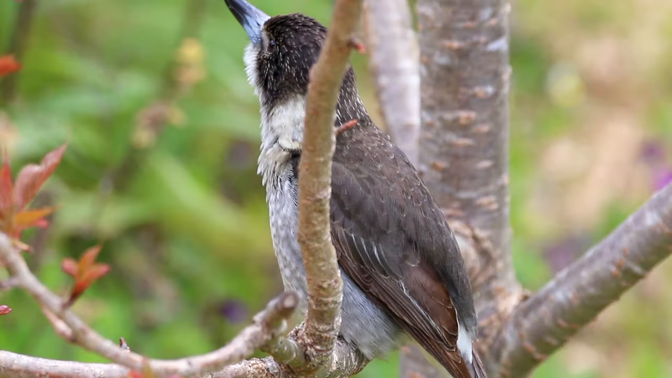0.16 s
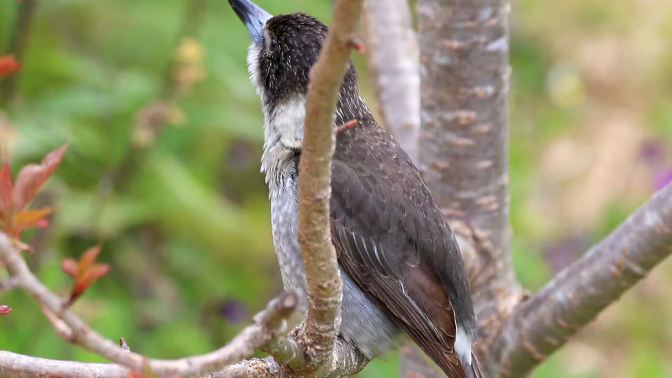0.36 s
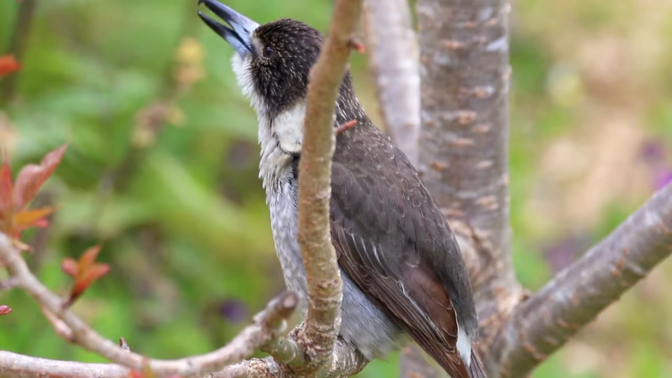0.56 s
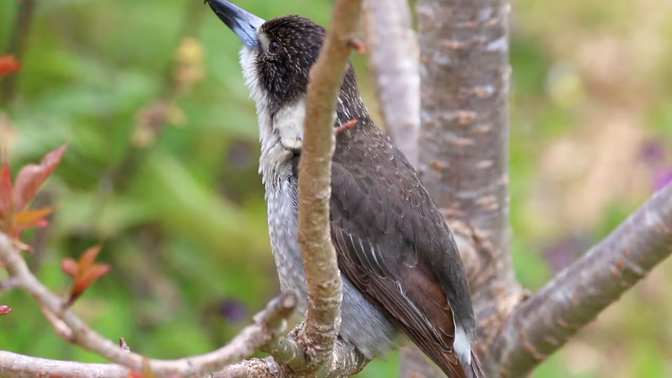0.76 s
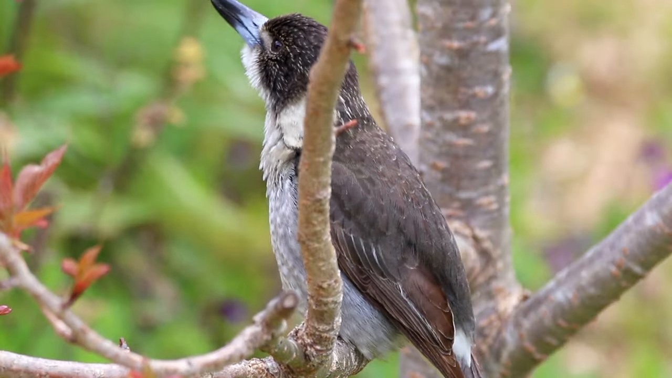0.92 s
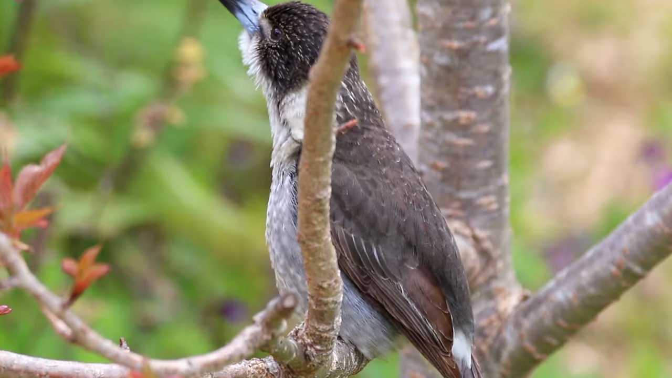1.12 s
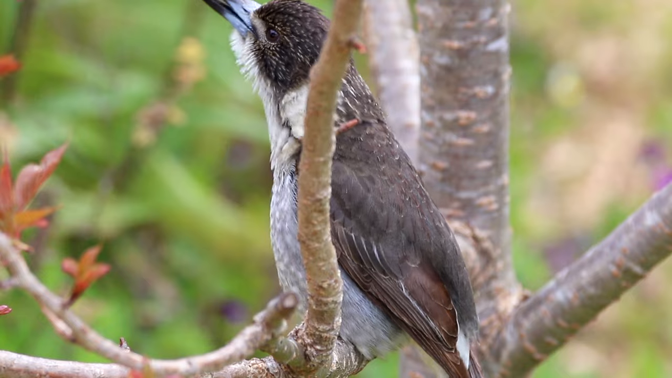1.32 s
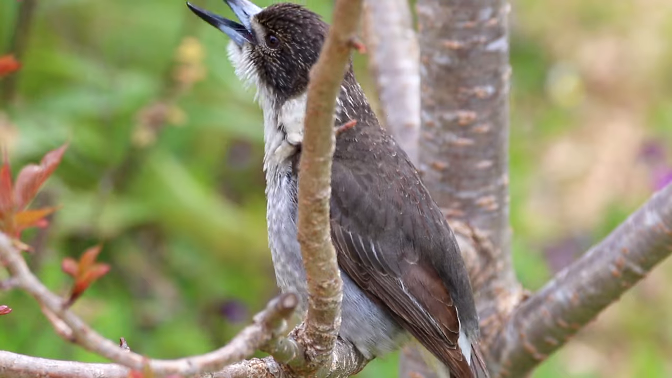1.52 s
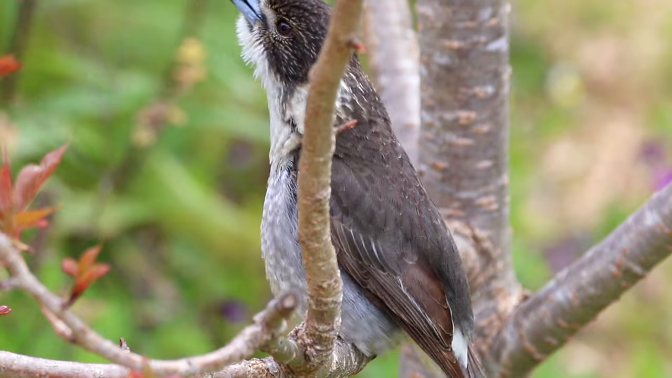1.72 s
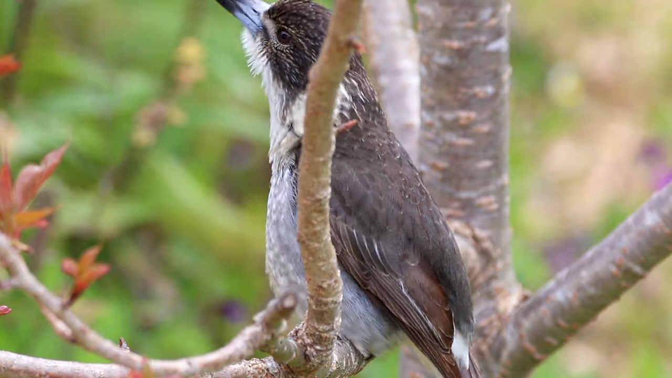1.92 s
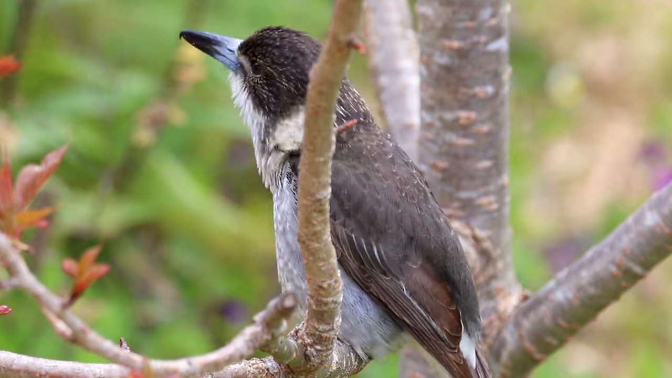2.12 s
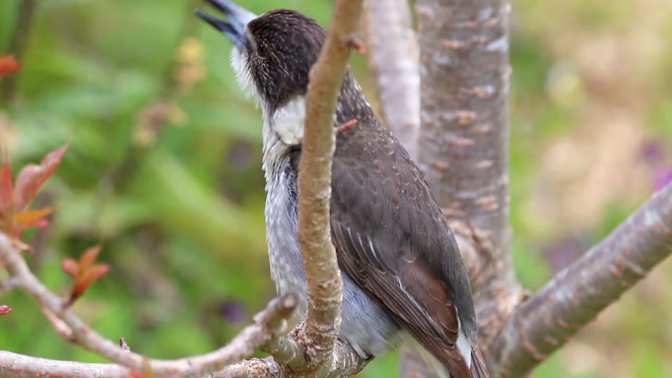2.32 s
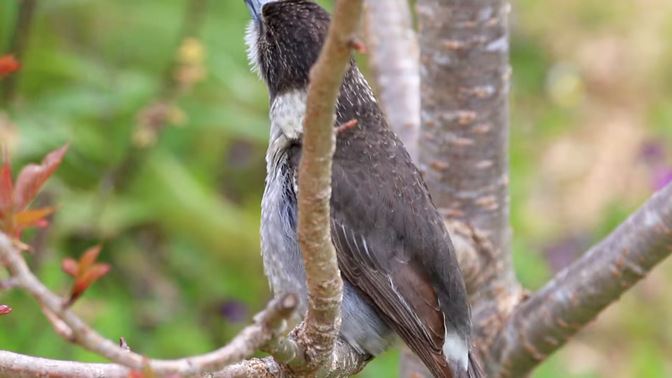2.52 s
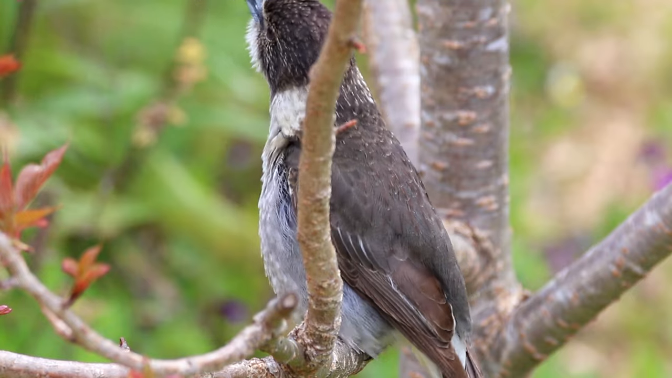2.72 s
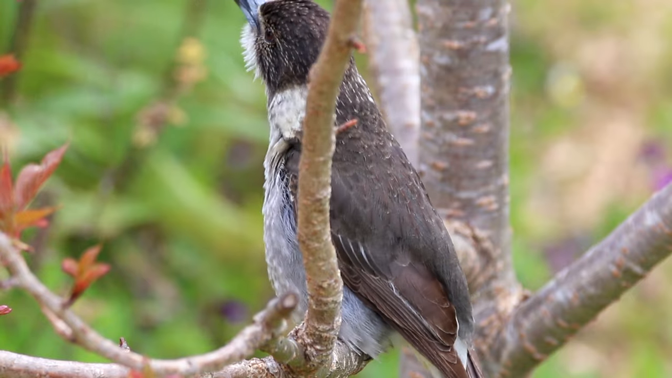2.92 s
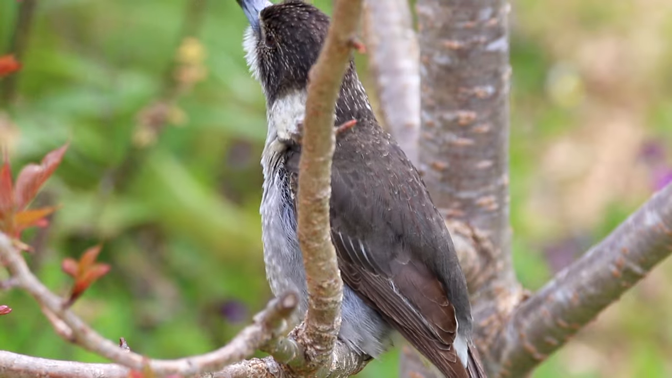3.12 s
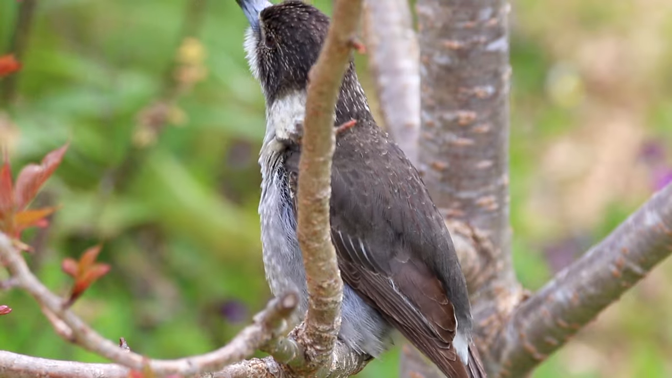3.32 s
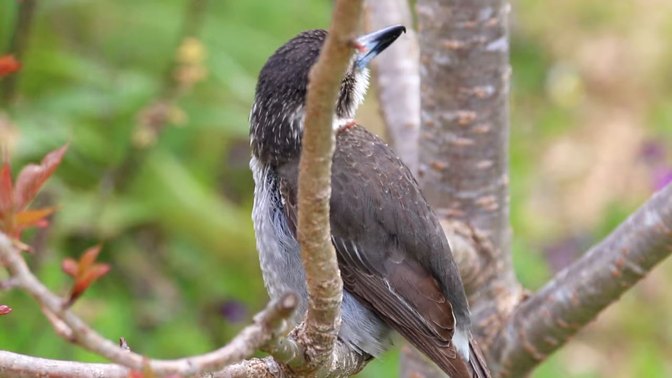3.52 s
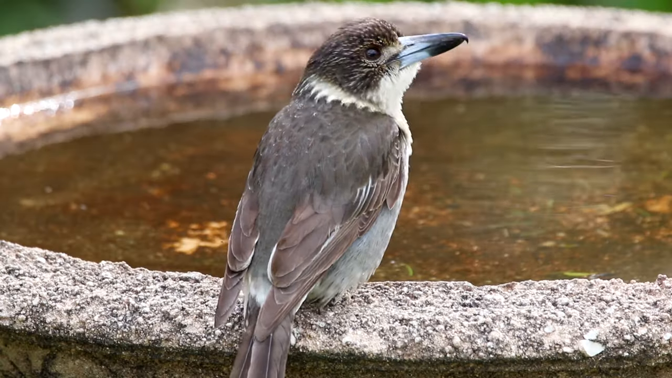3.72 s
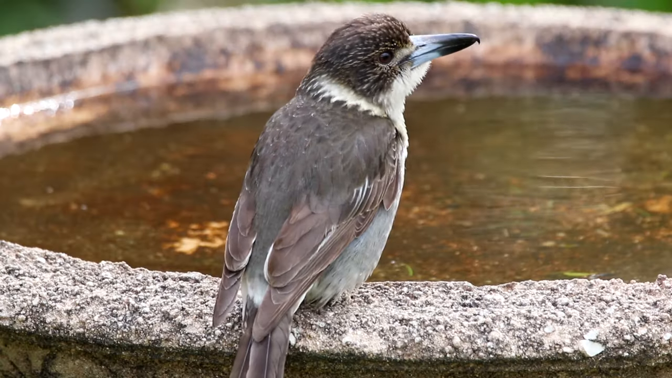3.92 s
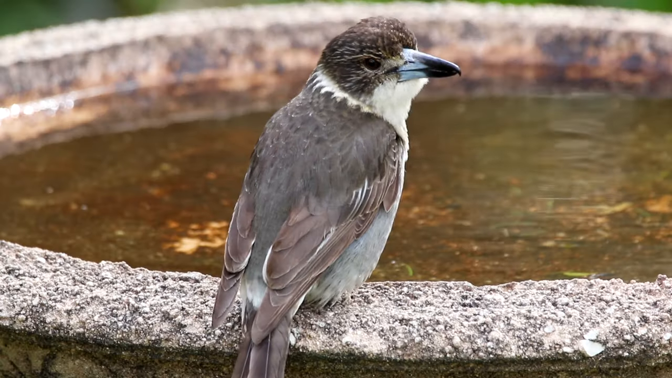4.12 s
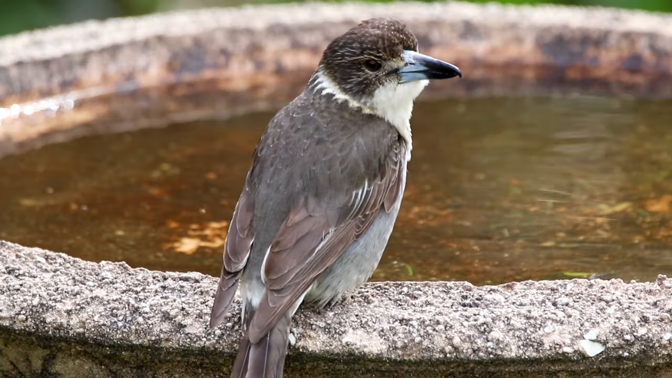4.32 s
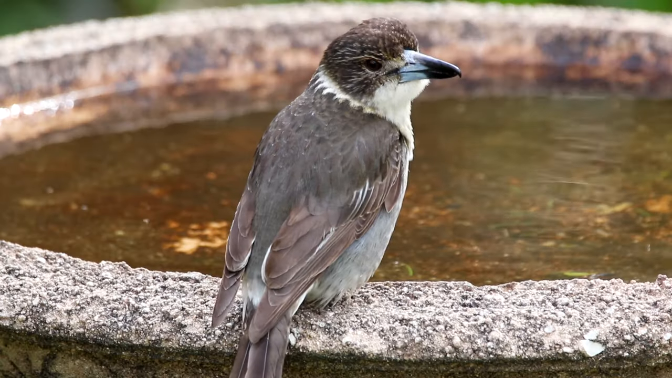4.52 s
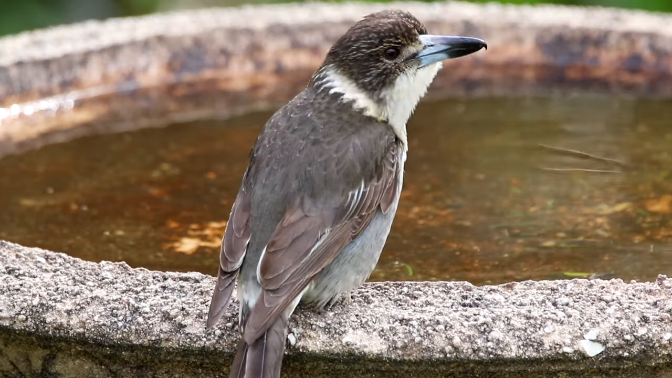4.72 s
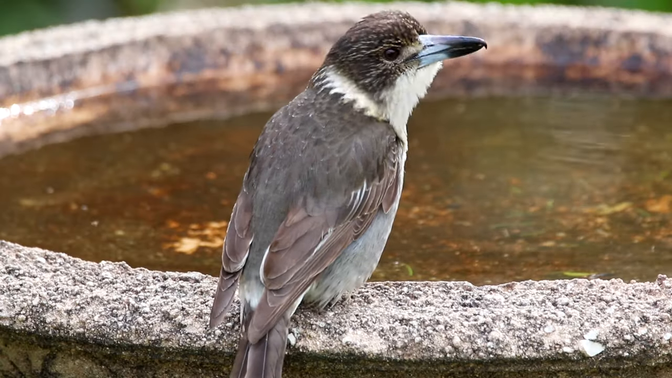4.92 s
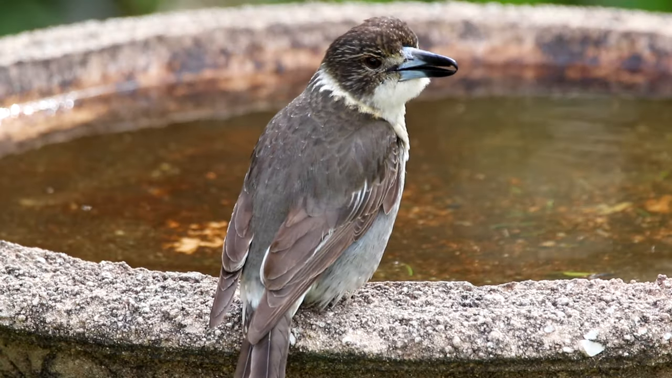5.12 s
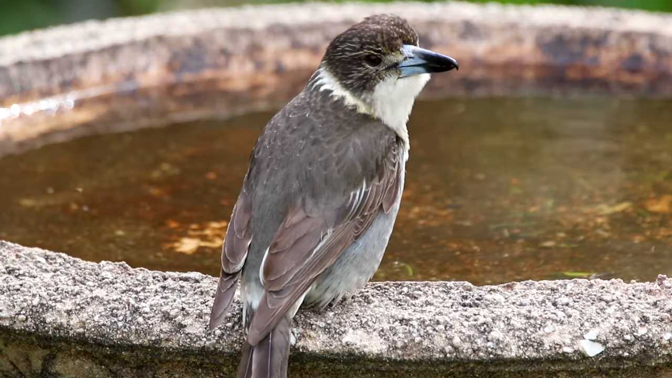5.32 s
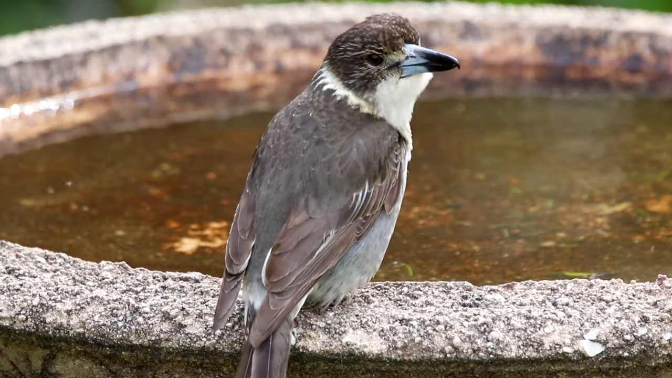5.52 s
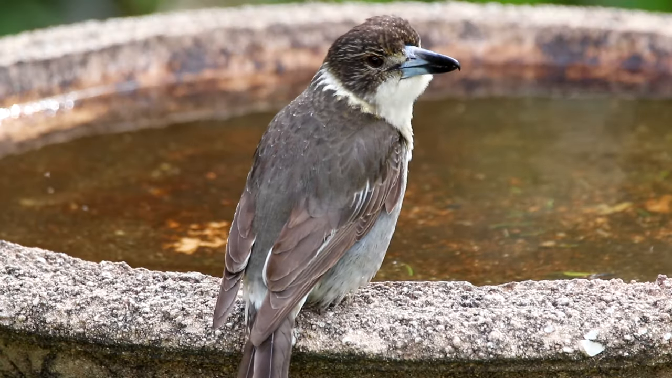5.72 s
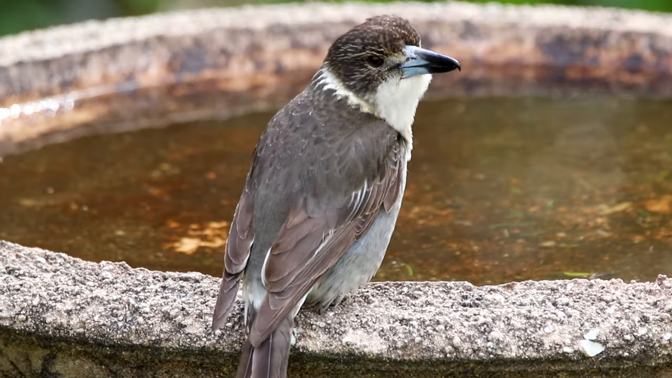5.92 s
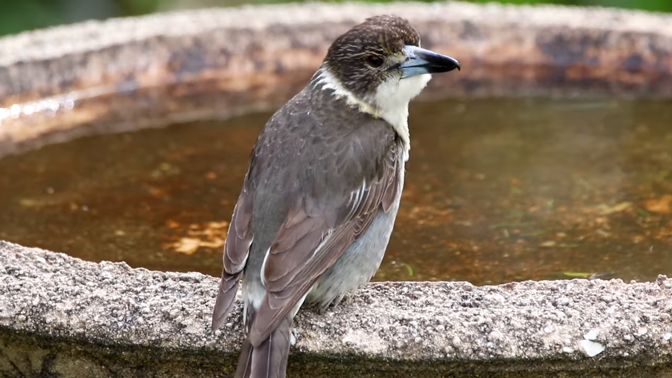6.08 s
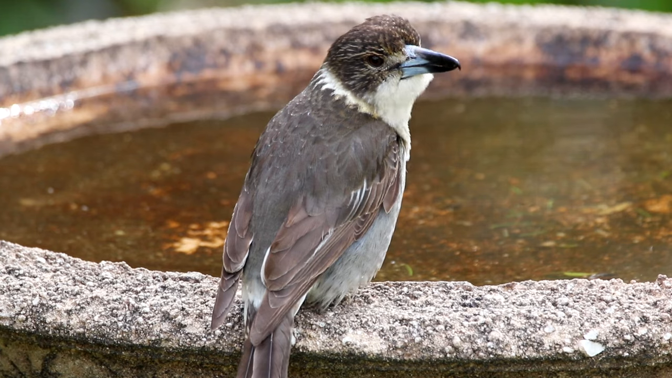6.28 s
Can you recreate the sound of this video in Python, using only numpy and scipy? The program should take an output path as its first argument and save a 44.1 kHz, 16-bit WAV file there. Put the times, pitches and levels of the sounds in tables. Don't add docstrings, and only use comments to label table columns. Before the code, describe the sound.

A quiet garden with low distant traffic, faint leaf hiss and a passing car fading at the start. From 0 to 0.85 s a butcherbird gives short soft glides, rising then falling, pure and shaky. At 1.0 s it begins a loud phrase: a wavering warble, a dip and climb around 1.3 s, then falling and fluty pipes from 1.6 to 1.97 s. A quiet low hum follows at 2.1 s. The second, louder phrase runs 2.4 to 3.0 s, with two falling pipes, tiny upward flicks, a bright pipe ending high and a closing pip, echoing off walls and trees. A low engine drone swells around 2 to 2.9 s and returns faintly near the end. After 3.6 s the background is slightly louder; soft scattered notes continue from 3.8 s, with rough scolds at 5.25 and 6.3 s and a clearer held note at 5.5 s. Tiny far birds chirp and rasp throughout.

```python
import sys
import numpy as np
from scipy import signal
from scipy.fft import rfft, irfft, next_fast_len
from scipy.io import wavfile
from scipy.ndimage import uniform_filter1d, map_coordinates

SR = 44100
rng = np.random.default_rng(int(sys.argv[2]) if len(sys.argv) > 2 else 0)


def gain_from_db(level_db):
    decades = np.asarray(level_db, float) / 20
    return 10 ** decades


def master(y):
    cut = np.clip(np.atleast_2d(y).T, -1, 1)
    pcm = np.round(cut * 32767)
    wavfile.write(sys.argv[1], SR, pcm.astype(np.int16))


N = 280035
EARLY_S = 0.1


def unit(x):
    return x / np.sqrt(np.mean(x ** 2) + 1e-20)


def along(points, hz):
    f, v = np.transpose(points)
    return np.interp(np.log(hz + 1), np.log(f + 1), v)


def curves(rows, t):
    s, *columns = np.transpose(rows)
    return [np.interp(t, s, column) for column in columns]


def wobble(rate, size):
    knots = rng.standard_normal(size=512)
    return map_coordinates(knots, [np.arange(size) * rate / SR], mode="wrap")


def noise(gain):
    m = next_fast_len(N)
    spectrum = rfft(rng.standard_normal(m)) * gain(np.fft.rfftfreq(m, 1 / SR))
    return unit(irfft(spectrum, m)[:N])


def shaped(shape, calls):
    notes = []
    for s, length, from_hz, to_hz, db in calls:
        notes.append([(s + u * length, from_hz + glide * (to_hz - from_hz), db + under_db)
                      for u, glide, under_db in shape])
    return notes


# frequency in Hz, level in dB per Hz.
TRAFFIC = [(15, -60), (25, -0.5), (236, -1), (300, -6.5), (345, -4), (381, -6), (485, -5), (1400, -11),
           (1610, -22.5), (1750, -14), (3000, -37.5), (3900, -45), (6600, -120)]
# frequency in Hz, level in dB per Hz.
LEAVES = [(1180, -25), (2000, -5.5), (2370, -4), (2840, -5), (3620, -8.5), (3970, -11), (6100, -12),
          (8390, -11.5), (15600, -17)]
# time in seconds, level in dB.
DRONE = [(0, -74.5), (1.5, -61.5), (2.03, -47.5), (2.87, -50), (3.1, -56), (4.9, -61.5), (5.9, -59.5),
         (6.35, -52.5)]


def background():
    t = np.arange(N) / SR
    move_s, move_takes_s = 3.63, 0.35

    def placed(tree_db, bath_db):
        return np.interp(t, [move_s, move_s + move_takes_s], [tree_db, bath_db])

    def low(f):
        return 1 / (1 + (f / 90) ** 4)

    rumble_db = placed(-84, -76.5) + 4.5 + 1.1 * wobble(3.1, N)
    rumble = gain_from_db(rumble_db) * noise(lambda f: gain_from_db(along(TRAFFIC, f)) * low(f))
    departing_db = 3.5 * np.exp(-t / 1.0)
    traffic_db = placed(-62, -59) + departing_db + 2.0 + 0.12 * wobble(2.5, N)
    traffic = gain_from_db(traffic_db) * noise(lambda f: gain_from_db(along(TRAFFIC, f)) * (1 - low(f)))
    leaves = gain_from_db(placed(-70, -67.5)) * noise(lambda f: gain_from_db(along(LEAVES, f)))
    drone_hz = 205.5 * (1 + 0.012 * wobble(14, N))
    turns = np.cumsum(drone_hz) / SR
    drone_db = curves(DRONE, t)[0] - 12.5 + 2.2 * wobble(9, N)
    drone = gain_from_db(drone_db) * np.sin(2 * np.pi * turns)
    return rumble + traffic + leaves + drone


# start in seconds, length in seconds, centre in Hz, width in Hz, level in dB.
CHATTER = [(0, 0.18, 3520, 2500, -72), (2.18, 0.32, 3080, 2590, -68), (3.258, 0.32, 4570, 3540, -69.5),
           (3.946, 0.094, 3380, 2500, -66.5), (4.197, 0.49, 3320, 2500, -73.5),
           (4.36, .06, 4400, 1200, -72), (4.59, 0.22, 3040, 2000, -73.5), (5.025, .03, 3300, 2500, -70),
           (6.003, 0.28, 2650, 1470, -74), (6.264, 0.15, 4430, 4000, -70)]


def chatter():
    t, out = np.arange(N) / SR, np.zeros(N)
    for s, length, centre_hz, width_hz, db in CHATTER:
        progress = np.clip((t - s) / length, 0, 1)
        swell = np.sqrt(np.sin(np.pi * progress).clip(0))
        band = noise(lambda f: np.exp(-2 * ((f - centre_hz) / width_hz) ** 2))
        out += gain_from_db(db + 0.53 * wobble(40, N)) * swell * band
    return out


# frequency in Hz, gain in dB.
THROAT = [(1500, 20.5), (3000, -2.5), (4500, -9), (5200, -6.5), (6500, -1.5), (8000, -12.5), (9500, -14),
          (11000, -17), (13000, -12.5), (16000, -31)]


def whistle(out, rows, voice, waver, count, steady=0, sheen_db=0, shake_db=2.1, shaping=None, opening=1):
    first = round((rows[0][0] + EARLY_S) * SR)
    size = round((rows[-1][0] - rows[0][0]) * SR)
    t = rows[0][0] + np.arange(size) / SR
    hz, level_db = curves(rows, t)
    overtone_db, even_db, beak_hz, lift_db, tilt_db = voice

    effort_db = uniform_filter1d(level_db, size=round(.02 * SR), mode="nearest") if steady else level_db
    bright_db = overtone_db + steady * (level_db.max() - effort_db) + effort_db - level_db
    bright_db = bright_db + 42 * np.log2(hz / 1450).clip(None, 0)
    bands = []
    if shaping:
        bands = [shaping[:2], shaping[2:4], (15600, shaping[5])]
        bright_db = bright_db + shaping[4] * np.linspace(-.5, .5, size)

    hz = uniform_filter1d(hz, size=150, mode="nearest") * (1 + waver * wobble(151, size))
    phase = 2 * np.pi * np.cumsum(hz) / SR
    tone = gain_from_db(shake_db * wobble(102.5, size)) * np.sin(phase)
    opening_db = -2.5 * opening * np.exp((t[0] - t) / .014)
    for k in range(2, count + 1):
        over_hz = k * hz
        beak_db = lift_db * np.cos(2 * np.pi * over_hz / beak_hz) + tilt_db * np.log2(over_hz / 5000)
        gain_db = bright_db + along(THROAT, over_hz) + beak_db + even_db * (1 - k % 2)
        gain_db += k * opening_db + sheen_db * np.exp(-((over_hz - 14000) / 2500) ** 2)
        for band_hz, db in bands:
            gain_db += db * np.exp(-((over_hz - band_hz) / 570) ** 2)
        breath = 1 + gain_from_db(-23) * np.sqrt(k) * wobble(1500, size)
        strength = gain_from_db(gain_db + 4.5 * wobble(60, size)) * breath
        tone += strength * (over_hz < SR / 2) * np.sin(k * phase)
    edge = np.clip(np.minimum(t - t[0], t[-1] - t) / .003, 0, 1)
    laid = out.copy()
    laid[first:first + size] += np.sqrt(2) * gain_from_db(level_db) * edge * tone
    return laid


# part of the length from 0 to 1, part of the glide from 0 to 1, level against the peak in dB.
SWELL = [(0, 0.015, -7), (.3, .3, -2.5), (.7, .7, -2.5), (1, 0.94, -1.5)]
RISE = [(0, 0.012, -15), (.15, 0, -12), (.3, .09, -8.5), (.47, .32, -2), (.62, .76, 0.5), (.8, 0.98, 0.5),
        (1, 0.98, -15)]
FALL = [(0, 0, -16), (.12, 0.031, -4), (.43, 0.58, -3.5), (.65, .87, -4), (1, 1, -3.5)]
HOLD = [(0, 0.019, -9), (.18, .9, -3), (.26, 0.99, -4), (.52, .9, 4), (.64, 0.876, -9), (.85, 0.9, -9),
        (1, 0.64, -4.5)]
# start in seconds, length in seconds, first pitch in Hz, last pitch in Hz, peak in dB.
MUTTERS = [(-.06, 0.062, 1797, 1740, -48), (3.805, 0.078, 1355, 1530, -65),
           (3.849, 0.045, 1697, 1350, -58.5), (3.895, 0.054, 1380, 1656, -62),
           (4.11, 0.067, 1840, 1990, -52), (4.199, 0.045, 1477, 1500, -46),
           (4.409, 0.043, 1572, 1277, -52.5), (4.445, 0.047, 1350, 1884, -54.5),
           (4.84, 0.042, 1176, 1212, -49.5), (5.755, 0.038, 896, 1163, -47.5),
           (5.316, 0.026, 1325, 2010, -46.5), (6.241, .11, 1160, 1906, -53.5)]
RISES = [
    (0.162, 0.062, 813, 2150, -42.5),
    (0.593, 0.07, 854, 2276, -39.5),
    (4.853, 0.051, 1355, 2384, -49),
    (5.752, 0.078, 874, 2130, -54),
]
FALLS = [(0.333, 0.047, 1800, 876, -46), (.768, 0.05, 1896, 874, -42.5), (4.162, 0.042, 2393, 1530, -51),
         (5.005, 0.082, 1386, 1033, -46.5), (5.431, 0.06, 1524, 1010, -43.5),
         (5.938, 0.046, 1946, 825, -46.5)]
SCOLDS = [
    (5.237, 0.065, 2210, 1970, -52.5),
    (5.281, .018, 2010, 2640, -43),
    (6.272, 0.0356, 2334, 2170, -45.5),
    (6.302, 0.0246, 2140, 2590, -44),
]
HOLDS = [
    (5.507, 0.077, 1247, 1485, -35),
]
# overtones in dB, even overtones in dB, beak resonance spacing in Hz,
# beak lift in dB, tilt in dB per octave.
HOLD_VOICE = (-37, -1, 8600, 0, -3)


def soft_notes():
    soft = np.zeros(N + SR)
    for shape, calls, overtone_db in [(RISE, RISES, -30), (FALL, FALLS, -37), (SWELL, MUTTERS, -31)]:
        for rows in shaped(shape, calls):
            voice = (overtone_db, 1.5, 5000, 2.5, -3)
            soft = whistle(soft, rows, voice, waver=0.016, count=3, shake_db=3.0)
    for rows in shaped(HOLD, HOLDS):
        soft = whistle(soft, rows, HOLD_VOICE, waver=0.004, count=6, shake_db=.5,
                       shaping=(8500, 16, 6200, -14, -16, 0), opening=0)
    for rows in shaped(SWELL, SCOLDS):
        soft = whistle(soft, rows, (-22, 8, 7000, 3, 1.5), waver=0.0386, count=4, shake_db=4.0)
    return soft


# part of the length from 0 to 1, part of the glide from 0 to 1, level against the peak in dB.
ARCH = [(0, 0, -9), (.28, .85, -2), (.5, 1, 4), (.75, .7, -12.5), (1, .6, -19)]
# start in seconds, length in seconds,
# first pitch in Hz, last pitch in Hz, peak in dB.
FAR_BIRDS = [(0.018, 0.082, 4580, 4420, -70), (0.052, 0.018, 3370, 2580, -63),
             (1.958, 0.15, 3090, 3170, -71), (2.132, 0.071, 7320, 6970, -76),
             (3.278, 0.038, 3340, 3850, -63.5), (3.299, 0.026, 3705, 3344, -65.5),
             (3.543, 0.036, 2810, 3000, -72), (3.595, 0.035, 3110, 3205, -68),
             (3.796, .025, 2750, 2760, -76), (4.325, 0.092, 2130, 2890, -64.5),
             (5.29, 0.014, 4700, 5200, -75), (4.677, 0.043, 2670, 2300, -67),
             (6.039, 0.076, 2820, 3110, -72), (6.208, 0.041, 2480, 2474, -60),
             (6.273, 0.045, 2925, 2610, -54.5), (6.307, 0.021, 2730, 2900, -50.5),
             (5.287, 0.0254, 2930, 2720, -58)]
LONG_CALLS = [
    (.69, .3, 2900, 3190, -67),
    (.63, .12, 5950, 6100, -77),
    (1.13, .13, 5900, 5850, -79),
]
RASPS = [(0.453, 0.078, 6430, 5650, -75), (4.885, 0.028, 4700, 4800, -76), (2.182, 0.081, 2727, 3544, -69),
         (3.322, 0.21, 3600, 3550, -71), (4.211, 0.14, 2905, 3670, -68.5), (4.3, 0.12, 4200, 4550, -78),
         (4.32, 0.11, 2230, 2845, -70), (5.028, 0.018, 2370, 2220, -65), (6.27, 0.039, 7160, 6630, -80),
         (6.291, 0.037, 7070, 7400, -64)]
CROAK = [
    (3.93, 0.019, 1294, 1436, -70),
    (3.948, 0.026, 1417, 1274, -68),
    (4.0, .02, 1140, 1210, -86),
]
# overtones in dB, even overtones in dB, beak resonance spacing in Hz,
# beak lift in dB, tilt in dB per octave.
CROAK_VOICE = (8.5, 0, 5000, 1, -8.5)


def far_birds():
    calls = np.zeros(N + SR)
    for rows in shaped(SWELL, FAR_BIRDS) + shaped(ARCH, LONG_CALLS):
        calls = whistle(calls, rows, (-32, 6, 6000, 7, -2), waver=0.0081, count=2)
    for rows in shaped(SWELL, CROAK):
        calls = whistle(calls, rows, CROAK_VOICE, waver=0.012, count=6)
    for rows in shaped(SWELL, RASPS):
        calls = whistle(calls, rows, (-8, 0, 6000, 0, 0), waver=.14, count=2)
    return calls


# time in seconds, pitch in Hz, level in dB.
WARBLES = [
    [(1.022, 1915, -69), (1.032, 2340, -46), (1.05, 2020, -40), (1.066, 1965, -38), (1.076, 2428, -45),
     (1.087, 2010, -44), (1.096, 1454, -46), (1.112, 1680, -34), (1.126, 1780, -61)],
    [(1.264, 1074, -44.5), (1.276, 1646, -39.5), (1.29, 1312, -44), (1.299, 1120, -30), (1.306, 953, -46),
     (1.32, 830, -44)],
    [(1.318, 852, -40), (1.33, 1165, -37.5), (1.342, 1380, -33), (1.358, 1476, -33.5), (1.378, 1528, -31),
     (1.39, 1521, -36.5), (1.408, 1481, -32), (1.424, 1471, -33.5), (1.439, 1470, -78)],
]
DROPS_SUNG = [
    [(1.588, 1942, -45), (1.6, 1929, -33), (1.608, 1845, -32), (1.618, 1783, -27.5), (1.632, 1765, -25.5),
     (1.642, 1696, -26.5), (1.65, 1700, -41)],
    [(2.407, 1887, -43), (2.42, 1888, -36.5), (2.436, 1840, -30), (2.45, 1746, -23.5), (2.458, 1708, -21.5),
     (2.466, 1590, -23.5), (2.475, 1581, -29.5), (2.484, 1550, -40)],
    [(2.651, 1867, -41), (2.661, 1808, -35), (2.678, 1759, -27.5), (2.692, 1719, -20.5), (2.7, 1667, -23),
     (2.706, 1635, -30), (2.713, 1592, -24.5), (2.723, 1565, -35.5)],
]
PIPES = [
    [(1.7, 1320, -37), (1.716, 1308, -29.5), (1.728, 1339, -26.5), (1.742, 1340, -23.5), (1.755, 1302, -30),
     (1.767, 1277, -25), (1.778, 1265, -34.5), (1.786, 1285, -25), (1.804, 1250, -45)],
    [(1.862, 1236, -39), (1.874, 1233, -32.5), (1.883, 1238, -33), (1.897, 1306, -23.5), (1.907, 1316, -29),
     (1.928, 1266, -21), (1.937, 1210, -31), (1.947, 1139, -22.5), (1.967, 840, -37.5)],
    [(2.125, 790, -52), (2.145, 797, -40), (2.222, 789, -40), (2.24, 792, -49), (2.3, 790, -51),
     (2.4, 790, -62)],
    [(2.82, 1394, -40.5), (2.839, 1548, -30), (2.845, 1690, -20.5), (2.852, 1581, -21.5),
     (2.869, 1580, -29), (2.88, 1562, -22), (2.9, 1591, -24.5), (2.916, 1586, -22), (2.925, 1680, -17)],
]
# part of the length from 0 to 1, part of the glide from 0 to 1, level against the peak in dB.
FLICK = [(0, 0, 10), (.45, 0.94, 2.5), (1, 1, -5.5)]
PIP = [(0, 0.11, -13), (.33, 0.68, -2), (.66, .85, 1.5), (1, 0.96, -19)]
GRUNT = [(0, 0, -23), (.5, 0.56, -18.5), (1, 1, -7.5)]
# start in seconds, length in seconds, first pitch in Hz, last pitch in Hz, peak in dB.
FLICKS = [
    (1.64, 0.02, 1750, 2370, -38.5),
    (2.471, 0.018, 1568, 2245, -42),
    (2.576, 0.0086, 1870, 2110, -39),
    (2.921, 0.015, 1634, 2213, -39.5),
]
PIPS = [
    (2.557, 0.025, 1903, 1984, -40),
    (2.989, 0.0292, 1250, 1550, -29.5),
]
GRUNTS = [
    (2.799, 0.0244, 686, 940, -39.5),
    (2.973, 0.0154, 724, 900, -39),
]
# overtones at the peak in dB, even overtones in dB, beak resonance spacing in Hz,
# beak lift in dB, tilt in dB per octave.
VOICES = [(-23, 0, 4900, 2.5, 0.5), (-27.5, 9, 7600, 6, 2.5), (-26, 1.5, 3400, 3, 4),
          (-13.5, -4, 6450, 7, -3), (-28.5, 0, 9300, 5.5, 4), (-22, -8, 6300, -4, 5.5),
          (-12, -4, 4700, -4, 3.5), (-22, -5.5, 5280, 8, -4), (-5.5, -2.5, 4800, 5, 4.5),
          (-17, -5.5, 4710, 7, 0.5), (14, 6, 2400, 10, -5), (-21, -4.5, 4740, 7, 1), (12, 4.5, 2770, 4, -3),
          (-22, 1, 7700, -4.5, 5.5)]
FLICK_VOICE = (-10.5, 4.5, 5494, 1.5, 3)
# first band in Hz, its gain in dB, second band in Hz, its gain in dB, brightening over the note in dB.
THROAT_SHAPES = [(8350, -10, 4700, -2.5, -4), (12500, -4, 10200, 12, 0), (11900, -15, 10500, 11.5, -2),
                 (12300, -14, 10840, 8.5, 9.5), (7850, -7, 6900, 6, -16.5), (11500, -9, 7100, -2, -6),
                 (4060, 2, 2400, 4, -7), (15300, -15, 12700, 3, -4.5), (8100, -15, 12000, -15, -1),
                 (14600, -14, 13400, 2, 11), (10500, -7, 7400, 8, -13), (14300, -16, 5320, 3.5, 0),
                 (6000, -10, 3200, -1, 0), (13440, 5, 8600, 4, -15), (6300, 11, 9000, -8, 6),
                 (6700, 1, 9940, 17, -16), (8300, -13, 10200, 5, 2), (12930, -9, 8000, 8, -6)]
SHEEN_DB = [0, 2, -13, 0, 0, -2, -2, 15, 0, -3, 4, -6, -7, -5, -4]
TOP_DB = [1, 0, -4, 10, 3, -3, 0, 0, 2, -2, 0, 14, 0, 0, 1]


def piping():
    loud = np.zeros(N + SR)
    notes = sorted(WARBLES + PIPES + DROPS_SUNG + shaped(PIP, PIPS) + shaped(GRUNT, GRUNTS))
    flicks = shaped(FLICK, FLICKS)

    def repeat_last(table):
        return table + table[-1:] * len(flicks)

    settings = zip(notes + flicks, repeat_last(VOICES + [FLICK_VOICE]), repeat_last(SHEEN_DB),
                   repeat_last(TOP_DB), THROAT_SHAPES)
    for rows, voice, sheen_db, top_db, shaping in settings:
        loud = whistle(loud, rows, voice, waver=0.002, count=14, steady=.4, sheen_db=sheen_db,
                       shake_db=.5, shaping=(*shaping, top_db))
    return loud


# frequency in Hz, time to fall by 60 dB in seconds.
GARDEN = [(700, 1), (1500, 1.45), (3000, .8), (5000, .8), (8000, .6), (13000, .45)]


def scatter(speed, onset, treble_db):
    hz, t, z = signal.stft(rng.standard_normal(SR), SR, nperseg=256)
    twigs = gain_from_db(treble_db * np.clip(np.log2(hz / 1600 + 1e-3), -1, 2))[:, None]
    decay = gain_from_db(-60 * speed * t / along(GARDEN, hz)[:, None])
    tail = signal.istft(z * decay * twigs, SR, nperseg=256)[1][:SR]
    tail = tail * np.clip(np.arange(SR) / SR / onset, 0, 1)
    return tail / np.linalg.norm(tail)


# delay in seconds, level in dB.
WALLS = [(.007, -9.5), (.016, -6), (.125, -22.5)]


def garden(x, wall_db, near_db, tail_db):
    branches = scatter(speed=3.5, onset=.003, treble_db=4)
    houses = scatter(speed=1.0, onset=0.017, treble_db=3.0)
    reply = gain_from_db(near_db) * branches + gain_from_db(tail_db) * houses
    reply[0] = 1
    for s, db in WALLS:
        reply[round(s * SR)] += gain_from_db(db + wall_db)
    return signal.fftconvolve(x, reply)[round(EARLY_S * SR):][:N]


def scene():
    turned_away = garden(soft_notes(), wall_db=-1.5, near_db=-3.5, tail_db=-26.0)
    far = garden(far_birds(), wall_db=2.0, near_db=-35, tail_db=-9.0)
    near = garden(piping(), wall_db=-5.0, near_db=-5.0, tail_db=-16)
    return (background() + chatter() + turned_away + far + near)[None]


def roll_off(x):
    return signal.sosfilt(signal.butter(12, 15710, fs=SR, output="sos"), x)


def record(dry):
    steep = signal.butter(2, 45, "high", fs=SR, output="sos")
    mix = signal.sosfilt(steep, dry)
    return roll_off(mix)


dry = scene()
out = record(dry)
master(out)
```